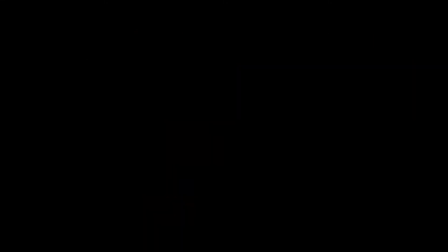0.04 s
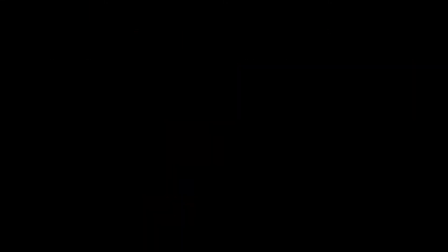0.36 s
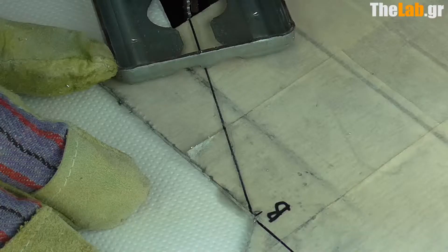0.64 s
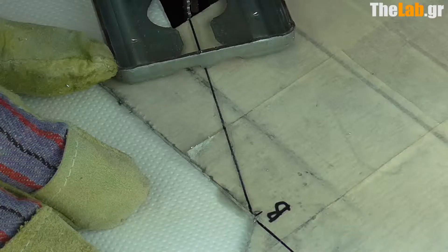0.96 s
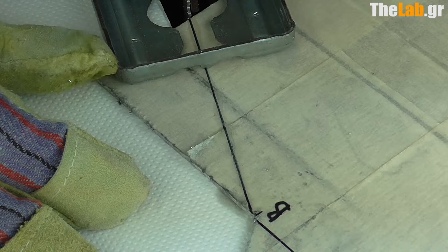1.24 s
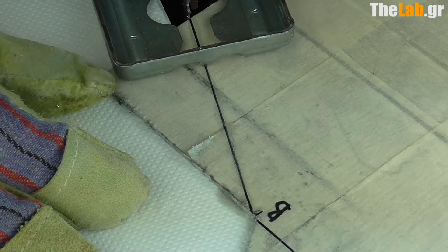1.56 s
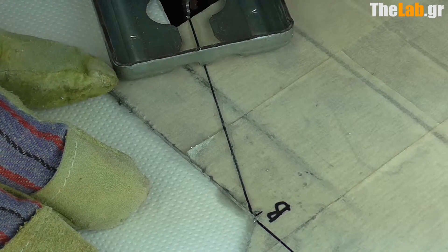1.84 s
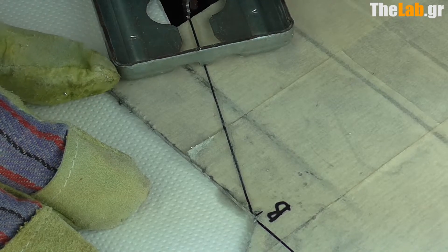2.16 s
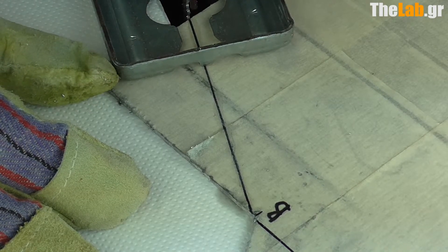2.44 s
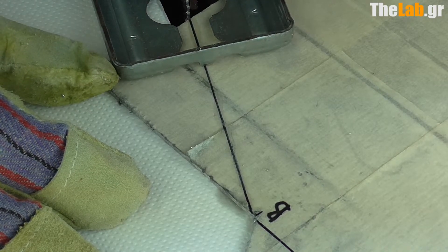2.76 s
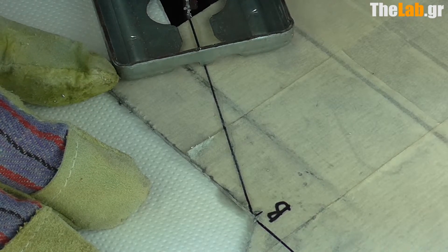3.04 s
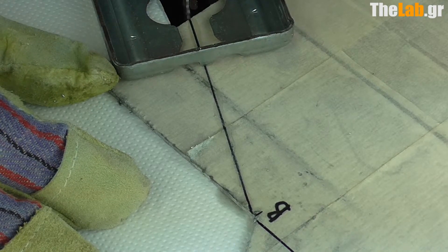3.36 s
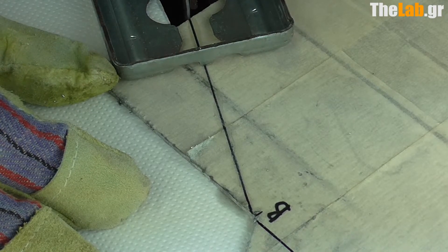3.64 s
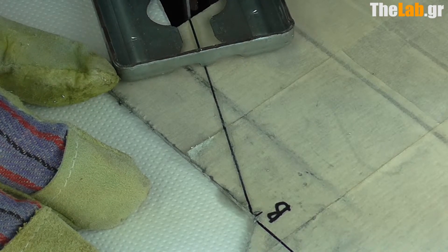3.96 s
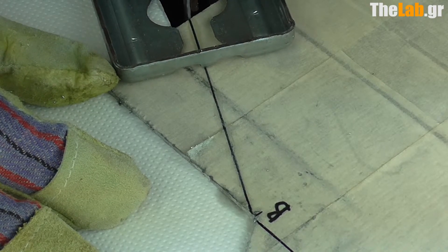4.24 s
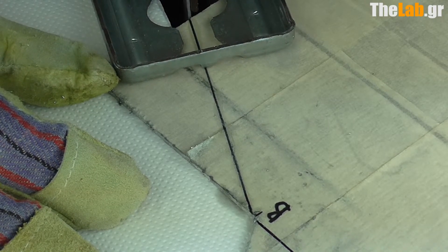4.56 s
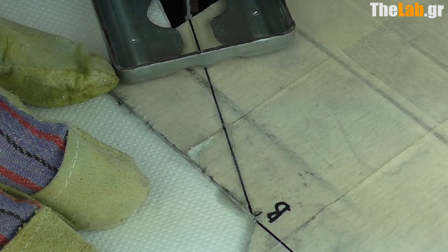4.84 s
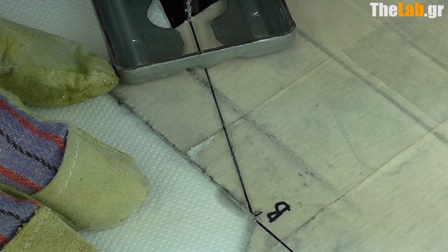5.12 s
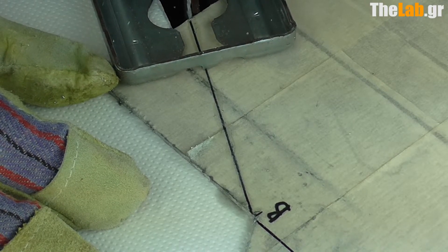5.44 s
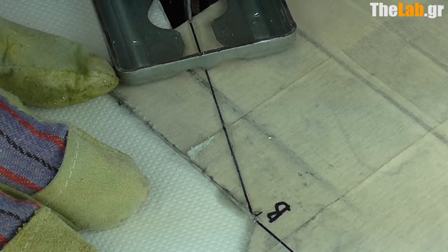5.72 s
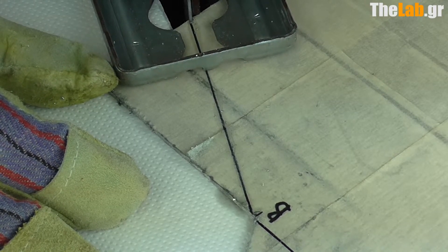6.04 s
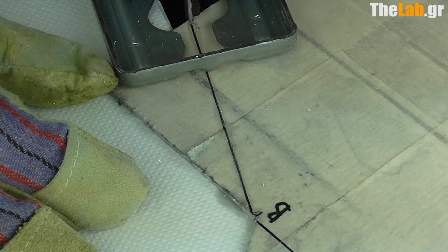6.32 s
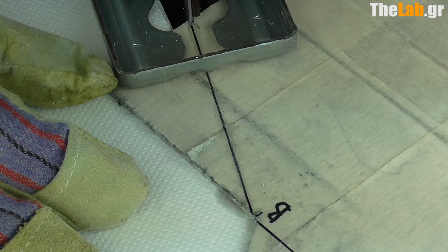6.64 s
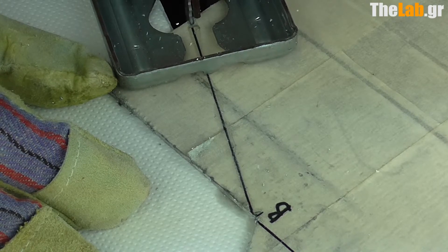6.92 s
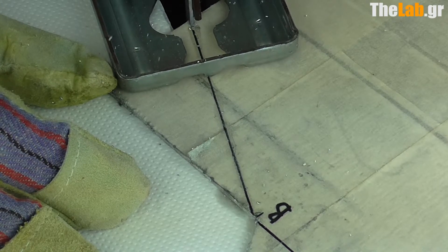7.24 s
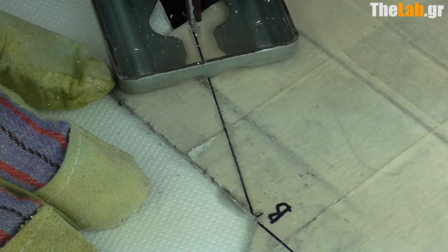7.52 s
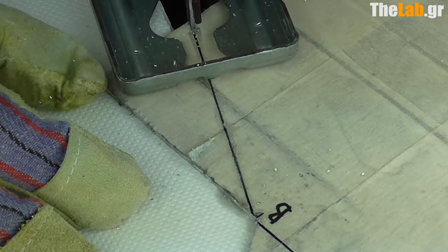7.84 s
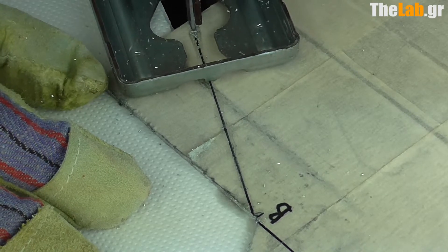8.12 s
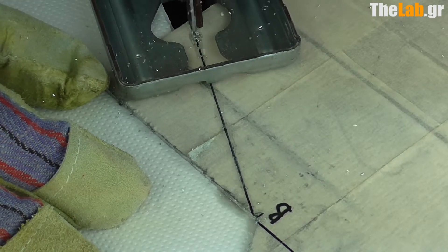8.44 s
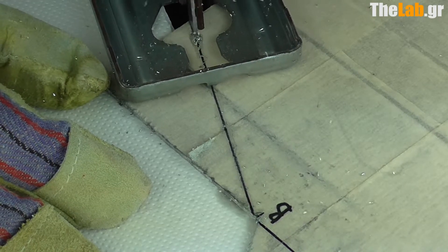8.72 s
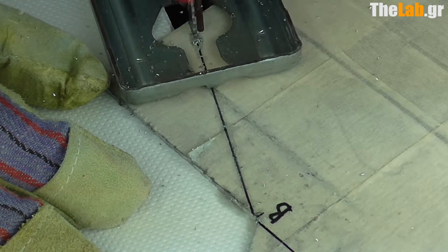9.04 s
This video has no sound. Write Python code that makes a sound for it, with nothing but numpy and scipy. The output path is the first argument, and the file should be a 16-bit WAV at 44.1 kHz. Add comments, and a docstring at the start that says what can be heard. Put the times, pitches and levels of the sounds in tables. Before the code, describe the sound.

A jigsaw starts up close by, whining and knocking, then bites into sheet metal with a harsh, rapid chatter, following a faint hum.

```python
"""A jigsaw cuts a metal sheet: on each upstroke its teeth strike the edge in a burst of small impacts.
The stroke lifts the sheet and lets it slap back, exciting bending modes that ring, drum and boom;
late in the cut the binding blade squeals by stick-slip friction. Before the cut, the saw is slid into
place in a humming room and spins up with knocks, mains buzz and a gear whine that rises with speed.
The microphone is close, above a tiled floor whose reflections add short echoes."""
import sys
import numpy as np
from scipy import signal
from scipy.fft import rfft, irfft
from scipy.io import wavfile
from scipy.ndimage import uniform_filter1d, map_coordinates

SR = 44100
rng = np.random.default_rng(int(sys.argv[2]) if len(sys.argv) > 2 else 0)


def store_wav(level_fs):
    """Save 16-bit WAV to argv[1]."""
    pcm = np.round(np.clip(np.atleast_2d(level_fs), -1, 1) * 32767)
    wavfile.write(sys.argv[1], SR, pcm.T.astype(np.int16))


N = 404838
TIME = np.arange(N) / SR
TRIGGER_S, TOUCH_S, ENGAGED_S, BITE_S = 2.817, 4.7, 5.1, 5.877
RETURN_PLACE = .57  # where in the stroke the blade rubs on its way back; places are in strokes


# rubbing on the return stroke: time_s, level_db
RETURN_RUB = [(5.0, -5.5), (5.3, -2.5), (5.8, -20.5), (6.8, -8), (7.7, -10), (8.45, -3), (8.8, -8),
              (9.18, -15)]
def teeth(turns):
    """Impact noise: a burst of tooth strikes on the upstroke, stray snags, then friction going down."""
    stroke = turns + 0.012 * drift(30)  # the teeth never grip at quite the same place
    upstroke = (window(stroke, -0.037, 0.039) + 0.79 * window(stroke, 0.067, 0.045)
                + 0.25 * window(stroke, 0.16, 0.049))
    rub = gain_of(curves(RETURN_RUB)[0] + 2 * drift(37))
    rub *= window(stroke, RETURN_PLACE, 0.081) + 0.52 * window(stroke, 0.72, 0.2)
    contact = upstroke * gain_of(2.3 * drift(37) + 2.2 * hard_strokes()) + rub + 0.024
    # the coarse part of the force repeats from stroke to stroke, the fine part does not
    coarse = colour(contact * repeating(turns), [(1800, -3.5), (3500, -6.5), (7000, -8.5)])
    fine = colour(contact * grit(0.22), [(1200, -0.5), (3000, -2.2)])
    # the first tooth lands with a bright tick, softer in the deep slot
    tick = unit_rms(colour(grit(3.1), [(5000, -37), (9000, 3), (15000, -6)]))
    tick *= window(stroke, -0.015, 0.043) * step(5.7) * (1 - 0.58 * ramp(6.6, 8.3))
    snag_force = blows(turns, place=.14, spread_db=5, jitter=.06)
    snags = crunches(snag_force, 0.00092, [(1000, -38), (4000, -7), (6500, 9), (15000, -11)]) * step(6)
    cutting = levelled(blade(gain_of(-2) * coarse + fine)) + gain_of(-1) * tick + gain_of(4.5) * snags
    entry_db = 4.5 * np.exp(-np.maximum(TIME - 4.95, 0) / 0.25)
    engagement = 0.46 * ramp(4.88, 4.93) + 0.47 * ramp(5.7, 5.75)
    return gain_of(-26.5 + entry_db + 1.28 * drift(7.1)) * cutting * engagement


# upstrokes that bite hard: time_s
HARD_STROKES = [5.908, 6.014, 6.328, 6.497, 6.636, 6.975, 7.009, 7.214, 7.248, 8.115, 8.25]
def hard_strokes():
    """Gating: 1 around each upstroke that bites hard, 0 elsewhere."""
    return sum(np.exp(-((TIME - time_s) / .012) ** 4) for time_s in HARD_STROKES)


# spectrum of tooth on metal: frequency_hz, gain_db
TOOTH_SPECTRUM = [(40, -77), (130, -46), (400, -8), (700, -13), (950, -18), (1350, -2), (1680, -13.5),
                  (1950, -6), (2700, -20), (3500, -16), (4200, -5.5), (5400, -6), (6400, -2), (8000, -6),
                  (9500, -14), (15000, -18)]
# resonances of blade and shoe: pitch_hz, bandwidth_hz, gain_db
BLADE_MODES = [(4210, 134, 5.5), (5214, 124, 3.5), (6390, 500, 9), (6900, 190, -3), (7740, 220, 0),
               (10240, 57, -18), (11500, 80, -19)]
def blade(force):
    """Resonance: blade and shoe add narrow peaks to the broad spectrum of tooth on metal."""
    broad = colour(force, TOOTH_SPECTRUM)
    tuned = ring(force, [(hz, 2.5 / width_hz, db) for hz, width_hz, db in BLADE_MODES])
    return broad + gain_of(-3) * tuned * np.std(broad) / np.std(tuned)


# bending modes of the sheet, in groups from low to high: pitch_hz, t60_s, gain_db
FLEX_MODES = [(150, 0.35, -2.5), (292, 0.28, -1.5)]
BOOM_MODES = [(265, 0.12, -16), (316.5, 0.22, 6), (373.3, 0.18, -5.5)]
LOW_DRUM = [(525.5, 0.092, 0.24), (555, 0.13, -1)]
HIGH_DRUM = [(560, 0.05, -3), (629, 0.15, -2.5), (733, 0.086, -22)]
LOW_RING = [(989, 0.08, -2.5), (1249, 0.075, 7.5), (1364, 0.062, 6)]
HIGH_RING = [(1496, 0.14, 2), (1844, 0.088, -12), (1900, 0.048, 0.5)]
# shifting grip on the sheet: time_s, slack_share (0 held, 1 free)
SLACK = [(5.6, 0.55), (6.3, 0.8), (6.85, 0.96), (7.2, 0.85), (8.07, 1), (8.22, 0.52), (8.8, 0.32),
         (9.18, 0.83)]
# strength of the drumming and of the ringing: time_s, low_group_db, high_group_db
DRUM_LEVELS = [(5.0, -37, -42), (5.51, -40, -41), (5.9, -32, -34.5), (6.84, -34, -27.5), (7.05, -33, -31),
               (7.22, -32.5, -32.5), (7.55, -30, -25.5), (7.98, -37, -33.5), (8.35, -25.5, -25.5),
               (8.46, -34, -28.5), (8.76, -34.5, -26.5), (9.0, -27, -30)]
RING_LEVELS = [(5.0, -54, -50), (5.72, -45, -42.5), (5.84, -28, -32), (6.5, -31.5, -30.5),
               (7.1, -29.5, -31.5), (7.6, -28, -34), (8.3, -31, -44), (8.65, -35.5, -32.5),
               (9.18, -27.5, -28.5)]
# dry knock of the bite: frequency_hz, gain_db
BITE_SPECTRUM = [(500, -25.5), (850, -15), (1000, 0), (1300, 9.5), (1600, -7), (1900, -2), (2600, -14),
                 (4000, -42.5)]
def sheet(turns):
    """Modal vibration of a plate: the bite rings the sheet; it lifts, slaps back, drums and flexes."""
    slack = curves(SLACK)[0]
    low_drum, high_drum = gain_of(curves(DRUM_LEVELS))
    low_ring, high_ring = gain_of(curves(RING_LEVELS))
    bite = blows(turns, place=-.048, spread_db=3.5, jitter=.001) * gain_of(4 * hard_strokes())
    slap = blows(turns, place=0.1706, spread_db=3)
    chatter = window(turns, 0.28, 0.44) * rng.standard_normal(N)  # loose shaking between blows
    lift = blows(turns, place=-.14, spread_db=2, wander=.009, jitter=.003)
    fall_back = np.roll(lift, round(.0095 * SR))
    drum_force = gain_of(-6) * lift + fall_back + .011 * chatter
    ring_force = bite + .02 * chatter
    # free, the sheet flexes; held, it booms higher instead
    out = gain_of(-32 - 31.5 * (1 - slack)) * radiate(slap + 0.0011 * chatter, FLEX_MODES)
    out += gain_of(-35.5 - 14.5 * slack ** 2) * radiate(slap + .008 * chatter, BOOM_MODES)
    # the two drumming groups swing in antiphase
    out += low_drum * radiate(drum_force, LOW_DRUM) - high_drum * radiate(drum_force, HIGH_DRUM)
    out += low_ring * radiate(ring_force, LOW_RING) + high_ring * radiate(ring_force, HIGH_RING)
    out += gain_of(-39.5) * ramp(5.74, 5.8) * unit_rms(colour(bite, BITE_SPECTRUM))
    thump_spectrum = [(40, -55), (60, -43), (88, -6), (120, 5), (200, -31), (400, -20)]
    thump = unit_rms(colour(slap + 0.051 * chatter, thump_spectrum))
    out += gain_of(-49.5) * thump * ramp(BITE_S, 7.7)
    return out * (0.51 * ramp(4.3, 5.0) + 0.21 * ramp(5.1, 5.9))


# teeth catching on the edge: start_s, scrape_db, ring_db
CATCHES = [(4.7348, -16, -38), (4.7915, -17, -40), (4.8231, -13, -36), (4.838, -14.5, -19.5),
           (4.9343, -18, -38), (4.9546, -13.5, -30), (4.9727, -23, -36), (5.0509, -15.5, -38),
           (5.144, -12.5, -28), (5.17, -12.5, -32), (5.1847, -16, -26), (5.2481, -19, -45),
           (5.262, -16.5, -24), (5.3394, -13, -19), (5.381, -17, -26), (5.4276, -16, -22),
           (5.585, -13.5, -18.5), (5.652, -17.5, -30), (5.7641, -21, -43), (8.52, -20, -29),
           (8.677, -13, -25)]
def catches():
    """Impulse response: a catching tooth scrapes the edge and leaves the sheet ringing freely."""
    start_s, scrape_db, ring_db = np.transpose(CATCHES)
    scrapes = gain_of(-3) * bursts(zip(start_s, scrape_db), 0.0024, blade)
    drums = gain_of(-15.5) * struck(start_s, scrape_db, LOW_DRUM + HIGH_DRUM)
    rings = gain_of(-1.5) * struck(start_s, ring_db, LOW_RING) + struck(start_s, ring_db, HIGH_RING)
    return scrapes + drums + rings


# singing of the binding blade: time_s, level_db
SQUEAL_LEVELS = [(8.2, -60), (8.33, -33.5), (8.6, -34), (9.18, -39)]
def squeal(turns, pitch_hz=4180):
    """Stick-slip oscillation: deep in the slot the blade binds and sings on every return stroke."""
    tone = unit_rms(np.sin(2 * np.pi * pitch_hz * TIME + drift(80)))
    binding = unit_rms(window(turns, RETURN_PLACE, 0.072) + 0.072)
    return gain_of(curves(SQUEAL_LEVELS)[0] + 2.8 * drift(23.3)) * tone * binding * ramp(8.1, 8.2)


# blade speed in the cut: time_s, stroke_rate_hz
CUT_SPEED = [(5.1, 24.93), (5.69, 26.15), (6.03, 28.77), (6.6, 29.54), (8.0, 28.51), (8.37, 30.82),
             (8.79, 31.97), (9.18, 32.62)]
def crank(free_rate_hz=25.619):
    """Phase is the integral of rate: strokes counted from the bite, through spin-up and cut."""
    engaged = ramp(TOUCH_S, ENGAGED_S)
    rate_hz = (1 - engaged) * free_rate_hz * spin_up() + engaged * curves(CUT_SPEED)[0]
    turns = np.cumsum(rate_hz) / SR
    return turns - np.interp(BITE_S, TIME, turns)


def spin_up(rise_s=.5603):
    """Inertia: the share of free-running speed climbs towards 1 after the trigger."""
    return 1 - np.exp(-(np.maximum(TIME - TRIGGER_S, 0) / rise_s) ** 1.278)


# level laws of the motor noises: base_db, strain_db, still_db, wake_share
SHAKE_LAW = (-30.5, 6, -5.5, 0.7)
GEAR_LAW = (-30, 11, -24.5, 0.16)
FAN_LAW = (-23, 10.5, -34, 0.44)
RATTLE_LAW = (-38.5, 16, -13, -0.7)
# spectra of shaking, gear clatter and fan hiss: frequency_hz, gain_db
SHAKE_SPECTRUM = [(60, -64), (100, -11), (160, 4), (240, 0.5), (340, 1), (480, -8.5), (700, -44)]
GEAR_SPECTRUM = [(60, -51), (250, -24), (450, -5.5), (610, 0), (780, -5.5), (1050, -7), (1500, -3.5),
                 (2100, -8.5), (2700, -12), (4000, -46)]
FAN_SPECTRUM = [(1500, -33.5), (2500, -5.5), (3100, -3), (4250, 6), (4800, 0), (5600, 1.5), (7200, -5),
                (8500, -6.5), (9600, -11.5), (15500, -20.5)]
# buzz of the straining motor: mains_harmonic, level_db
MAINS_BUZZ = [(2, -50), (3, -39.5), (4, -51), (5, -44.5), (6, -48.5)]
# throb of the free-running shaft: stroke_harmonic, level_db
UNBALANCE = [(7, -47), (8, -43.5)]
# the load takes up the play in the gears and quiets the motor: time_s, gain_db
LOAD_DAMPING = [(4.8, -2), (4.87, -7.5), (5.3, -10), (5.9, -9.5), (6.6, -8), (9.18, -6)]
def motor(turns, mains_hz=50):
    """Forced vibration: the motor shakes, buzzes and throbs; mains and crank modulate its noise."""
    mains_cycles = (TIME - TRIGGER_S) * mains_hz
    straining = 1 - ramp(3.13, 3.15)
    kicks = 1 + 2 * straining * window(mains_cycles, 0.19, 0.17)
    backlash = 1 + 0.43 * window(4 * turns, 0.4, 0.072)  # the play closes four times a stroke
    chop = kicks * backlash * gain_of(drift(90))
    shake = motor_level(*SHAKE_LAW) * levelled(colour(rng.standard_normal(N), SHAKE_SPECTRUM))
    shake *= gain_of(-8.5 - 2.4 * ramp(ENGAGED_S, BITE_S))
    buzz = harmonics(mains_cycles, MAINS_BUZZ, waver_rad=0.43) * (1 - ramp(3.48, 3.59))
    throb = harmonics(turns, UNBALANCE, waver_rad=0.62) * ramp(3.75, 4.0) * (1 - step(4.8))
    clatter = motor_level(*GEAR_LAW) * levelled(colour(chop * grit(3.25), GEAR_SPECTRUM))
    hiss = motor_level(*FAN_LAW) * levelled(colour(chop * grit(3.9), FAN_SPECTRUM))
    rattle = motor_level(*RATTLE_LAW) * shoe_rattle(chop)
    power_on = ramp(TRIGGER_S - .002, TRIGGER_S + 0.0025)
    return (shake + buzz + throb + clatter + hiss + rattle) * gain_of(curves(LOAD_DAMPING)[0]) * power_on


def motor_level(base_db, strain_db, still_db, wake_share):
    """Level follows speed: a noise wakes, then eases with the strain; a negative wake_share fades it."""
    pace = spin_up()
    return gain_of(base_db + strain_db * (1 - pace) + still_db * np.exp(-pace / wake_share))


def shoe_rattle(chop):
    """Intermittent contact: the shoe chatters on the sheet and excites its modes."""
    drumming = radiate(chop * grit(6.6), LOW_DRUM + HIGH_DRUM)
    return drumming + gain_of(-17) * radiate(chop * grit(1.4), LOW_RING + HIGH_RING)


# whine of the gears: time_s, level_db
WHINE_LEVELS = [(3.55, -55), (3.65, -36), (3.95, -39.5), (4.25, -47), (4.7, -53)]
def gear_whine(turns, meshes_per_stroke=363.5):
    """Gear meshing: a tone at a high multiple of the stroke rate, phase-modulated by the crank."""
    phase = 2 * np.pi * meshes_per_stroke * turns + 0.57 * np.sin(2 * np.pi * turns) + drift(90)
    level = gain_of(curves(WHINE_LEVELS)[0] + 3 * drift(29))
    return level * unit_rms(np.sin(phase)) * ramp(TRIGGER_S, 3.3) * (1 - ramp(TOUCH_S, ENGAGED_S))


# knocks as the motor kicks and jolts the saw while it runs up: start_s, level_db
MOTOR_KNOCKS = [(2.818, -20.5), (2.8367, -23), (2.9226, -23), (2.942, -25), (3.018, -15), (3.035, -20),
                (3.0755, -23), (3.1004, -9), (3.1178, -13), (3.1362, -12.5), (3.176, -14.5),
                (3.2703, -13.5), (3.2995, -11.5), (3.3154, -15), (3.4, -11.5), (3.5377, -13),
                (3.6848, -17), (3.845, -19), (4.1404, -11.5), (4.3433, -16), (4.5838, -17)]
# body of the carrier: frequency_hz, gain_db
CARRIER_SPECTRUM = [(80, -21), (250, -21), (1500, 4), (2800, -1.5), (4300, 9), (6500, 1.5), (10000, -13.5),
                    (16000, -18)]
def motor_knocks():
    """Structure-borne sound: the motor kicks the saw into motion in jolts, and each jolt rings the sheet."""
    start_s, level_db = np.transpose(MOTOR_KNOCKS)
    knocks = bursts(MOTOR_KNOCKS, 0.0028, lambda x: colour(x, CARRIER_SPECTRUM))
    return gain_of(-6.5) * knocks + gain_of(-8.5) * struck(start_s, level_db, LOW_RING + HIGH_RING)


# the two reversals of the crank: place_strokes, level_db
REVERSALS = [(.37, -18), (.92, -15.5)]
def reversals(turns):
    """Impact at reversal: while the blade runs free, its carrier clacks at both ends of the stroke."""
    strikes = sum(gain_of(db) * blows(turns, place, spread_db=-1.5) for place, db in REVERSALS)
    running_free = ramp(3.14, 3.16) * (1 - ramp(TOUCH_S, 5.23))
    return crunches(strikes * running_free, 0.00094, CARRIER_SPECTRUM)


# sliding the saw into place: time_s, level_db
SLIDE_LEVELS = [(0.75, -52), (1.004, -67.5), (1.35, -76), (1.508, -64), (1.686, -73.5), (1.994, -63),
                (2.2, -76)]
# ticks of the shoe: start_s, level_db
SHOE_TICKS = [(0.8545, -28), (1.3648, -45), (1.4232, -42), (1.4944, -32)]
# shoe rubbing on the sheet: frequency_hz, gain_db
SCUFF_SPECTRUM = [(900, 5), (2500, -7.5), (4500, -5.5), (7000, -9), (10000, -21), (16000, -29)]
def handling():
    """Sliding friction and light impact: the shoe scuffs, ticks, clacks and squeaks on the sheet."""
    scuff = gain_of(curves(SLIDE_LEVELS)[0] + 4 + 3.8 * drift(35.2))
    scuff *= unit_rms(colour(grit(1.7), SCUFF_SPECTRUM)) * ramp(0.77, 0.93) * (1 - ramp(2.14, 2.3))
    clack_modes = [(1970, 0.029, -2), (2300, .012, 8), (2830, 0.018, 6), (4700, .012, -9)]
    clack = bursts([(0.8649, -39)], 0.0025, lambda x: ring(x, clack_modes))
    squeak = bursts([(0.955, -60)], .009, lambda x: ring(x, [(4320, .04, -4), (5970, .03, 0)]))
    ticks = gain_of(-4) * bursts(SHOE_TICKS, 0.0021, lambda x: colour(x, SCUFF_SPECTRUM))
    return scuff + ticks + clack + squeak


# hum of the room: time_s, fundamental_db, octave_db
HUM_LEVELS = [(0.5, -51, -55), (0.61, -49, -68), (0.87, -54, -45), (1.94, -50.5, -51), (2.23, -69, -64),
              (2.37, -54, -56.5), (2.78, -58, -63)]
# dull wash of the room: frequency_hz, gain_db
WASH_SPECTRUM = [(21, -32), (35, -29), (64, -23), (81, -17), (120, -6), (136, -29), (147, -17), (184, -9.5),
                 (346, -6), (373, -12), (560, -14), (690, -24), (900, -17.5), (3000, -44), (3900, -86),
                 (6600, -120)]
def room(onset_s=.466):
    """Tones over broadband noise: wavering hum, drones, wash and hiss, fading once the saw runs."""
    hum, octave = gain_of(curves(HUM_LEVELS))
    wash = gain_of(-54 + 12 * np.exp(-np.maximum(TIME - onset_s, 0) / 1.34))
    drone = gain_of(-90) + gain_of(-41.5) * ramp(onset_s, 0.67) * (1 - ramp(0.814, 0.864))
    partials = [(57.3, hum), (114.6, octave), (249, drone), (287, gain_of(-58)),
                (344.5, gain_of(-53)), (516, wash * gain_of(-15.5))]
    tones = sum(level * unit_rms(np.sin(2 * np.pi * hz * TIME + 0.19 * drift(4.4)))
                for hz, level in partials)
    air = wash * unit_rms(colour(rng.standard_normal(N), WASH_SPECTRUM))
    hiss_spectrum = [(3200, -7), (4700, 2), (6000, -3), (15000, -5.5)]
    hiss = gain_of(-69) * unit_rms(colour(rng.standard_normal(N), hiss_spectrum))
    return (tones + air + hiss) * step(onset_s) * (1 - ramp(2.8, 3.6))


def echoes(t60_s):
    """Diffuse reverberation: a tail of dense reflections with energy 1 and an even spectrum."""
    t = TIME[:SR // 2]
    decay = gain_of(-60 * t / t60_s) * (t > .002)
    spectrum = rfft(rng.standard_normal(len(t)) * decay)
    tail = irfft(spectrum / (abs(spectrum) + 1e-12), len(t)) * np.sqrt(decay)
    return tail / np.linalg.norm(tail)


def ring(force, modes):
    """Modal superposition: a force drives damped sinusoids; a slow push makes no sound."""
    t = TIME[:SR // 2]
    response = sum(gain_of(db - 60 * t / t60_s) * np.sin(2 * np.pi * hz * t) for hz, t60_s, db in modes)
    slow_cut = signal.butter(2, modes[0][0] / 4, "highpass", fs=SR, output="sos")
    return signal.sosfilt(slow_cut, signal.oaconvolve(force, response)[:N])


def radiate(force, modes):
    """Plate radiation at a steady level; well below the modes, air slips round the edge unheard."""
    band = signal.butter(2, [.75 * modes[0][0], 1.4 * modes[-1][0]], "bandpass", fs=SR, output="sos")
    return levelled(signal.sosfilt(band, ring(force, modes)))


def struck(start_s, level_db, modes):
    """Free decay: clean single impulses on a set of modes."""
    force = np.zeros(N)
    force[np.round(start_s * SR).astype(int)] = gain_of(level_db)
    return ring(force, modes) / sum(gain_of(db) for _, _, db in modes)


def bursts(rows, decay_s, body):
    """Source and filter: a short noise burst for each (start_s, level_db), passed through a body."""
    out, t = np.zeros(N), TIME[:SR // 10]
    envelope = np.exp(-t / decay_s) * (1 - np.exp(-3 * t / decay_s))
    envelope /= envelope.max()
    for start_s, level_db in rows:
        out[round(start_s * SR):][:len(t)] += gain_of(level_db) * envelope * rng.standard_normal(len(t))
    return body(out) / np.std(body(rng.standard_normal(N)))


def crunches(strikes, decay_s, spectrum):
    """Convolution: each strike becomes a decaying puff of coloured noise."""
    noise = rng.standard_normal(N)
    envelope = signal.oaconvolve(strikes, np.exp(-TIME[:SR // 50] / decay_s))[:N]
    return colour(envelope * noise, spectrum) / np.std(colour(noise, spectrum))


def blows(turns, place, spread_db, wander=0, jitter=0):
    """Impulse train: one blow a stroke, its place wandering slowly and jittering fast (in strokes)."""
    count = np.floor(turns - place + wander * drift(2.5) + jitter * drift(11))
    return np.diff(count, prepend=count[0]) * gain_of(spread_db * drift(22))


def harmonics(cycles, rows, waver_rad):
    """Harmonic series: wavering tones at whole multiples of a cycle."""
    return sum(gain_of(db) * unit_rms(np.sin(2 * np.pi * k * cycles + waver_rad * drift(14)))
               for k, db in rows)


def repeating(turns, size=1500):
    """Periodic noise: roughness that comes round again with every stroke."""
    return map_coordinates(rng.standard_normal(size), [turns % 1 * size], order=1, mode="grid-wrap")


def grit(spread_db):
    """Heavy-tailed noise: dense tiny impacts of uneven size."""
    return unit_rms(rng.standard_normal(N) * gain_of(spread_db * np.minimum(rng.exponential(1, N), 5)))


def drift(cutoff_hz):
    """Low-pass noise: a slow random fluctuation of rms 1."""
    return unit_rms(irfft(rfft(rng.standard_normal(N)) * (np.fft.rfftfreq(N, 1 / SR) < cutoff_hz), N))


def colour(x, spectrum):
    """Minimum-phase filtering by a spectrum of (frequency_hz, gain_db) points."""
    gain_db = spectrum_at(spectrum, abs(np.fft.fftfreq(4096, 1 / SR)))
    log_gain = np.log(gain_of(np.maximum(gain_db, -100)))
    taps = np.fft.ifft(np.exp(np.conj(signal.hilbert(log_gain)))).real
    return signal.oaconvolve(x, taps[:len(taps) // 2])[:N]


def spectrum_at(spectrum, hz):
    """Interpolation on a log-frequency axis."""
    frequency_hz, gain_db = np.transpose(spectrum)
    return np.interp(np.log(hz + 1), np.log(frequency_hz + 1), gain_db)


def curves(rows):
    """Interpolation in time: one curve for each value column."""
    time_s, *columns = np.transpose(rows)
    return [np.interp(TIME, time_s, column) for column in columns]


def window(cycles, centre, width):
    """Periodic envelope: a Gaussian bump at one place in every cycle."""
    return np.exp(-.5 * (((cycles - centre + .5) % 1 - .5) / width) ** 2)


def ramp(start_s, end_s):
    """Linear rise from 0 to 1."""
    return np.clip((TIME - start_s) / (end_s - start_s), 0, 1)


def step(start_s):
    """Rise from 0 to 1 in a millisecond."""
    return ramp(start_s, start_s + .001)


def levelled(x):
    """Running normalisation: rms near 1 over a few strokes, leaving each stroke its shape."""
    power = uniform_filter1d(uniform_filter1d(x ** 2, size=4500), size=4500)
    return x / np.sqrt(abs(power) + 0.0012 * np.mean(x ** 2))


def unit_rms(x):
    """Normalisation to rms 1."""
    return x / np.sqrt(np.mean(x ** 2) + 1e-20)


def gain_of(db):
    """Decibels to amplitude."""
    return 10 ** (np.asarray(db) / 20)


# reflections in the side channel: frequency_hz, gain_db
SIDE_SPECTRUM = [(100, -17.5), (250, -12), (550, -11.5), (1200, -7.5), (4000, -10.5), (6000, -9),
                 (8000, -8.5), (10500, 4.5), (14000, -14)]
# balance of the microphone pair: frequency_hz, left_over_right_db
BALANCE = [(550, -0.1), (1200, -2.5), (8000, -1.5), (12000, -2.7)]
def scene():
    """Superposition: the crank times saw and sheet; floor and wall reflections add echoes and width."""
    turns = crank()
    saw = handling() + motor(turns) + reversals(turns) + gear_whine(turns)
    saw += teeth(turns) + squeal(turns) + motor_knocks() + catches()
    reflections = gain_of(-10) * signal.oaconvolve(saw, echoes(t60_s=0.067))[:N]
    direct_and_early = saw + reflections + sheet(turns) + room()
    late = signal.oaconvolve(direct_and_early, echoes(t60_s=0.32))[:N]
    hz = np.fft.rfftfreq(N, 1 / SR)
    mid = rfft(direct_and_early)
    side = rfft(late) * gain_of(spectrum_at(SIDE_SPECTRUM, hz) - 3)
    lean = gain_of(spectrum_at(BALANCE, hz) / 2)
    return irfft(np.array([(mid + side) * lean, (mid - side) / lean]), N)


def record(dry):
    """Soft saturation rounds the loudest peaks; a low-pass filter limits the band to 16 kHz."""
    rounded = dry / (1 + (dry / .52) ** 4) ** (1 / 4)
    low_pass = signal.firwin(511, 16000, window=("kaiser", 9), fs=SR)
    return signal.oaconvolve(rounded, low_pass[None], "same")


dry = scene()
out = record(dry)
store_wav(out)
```